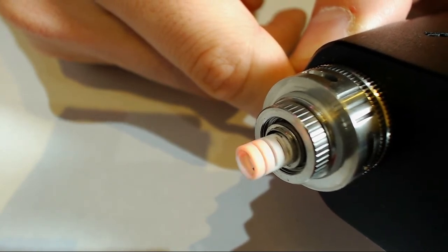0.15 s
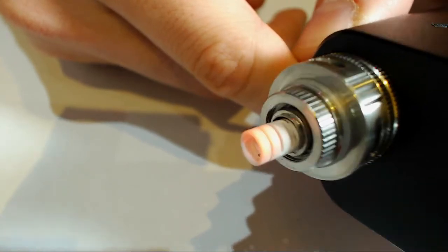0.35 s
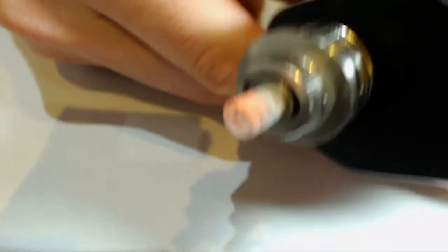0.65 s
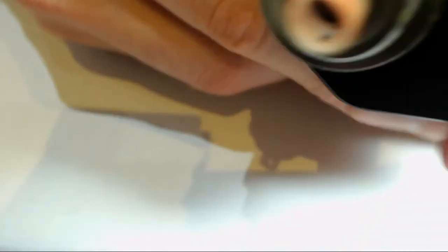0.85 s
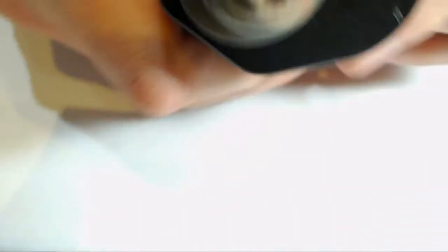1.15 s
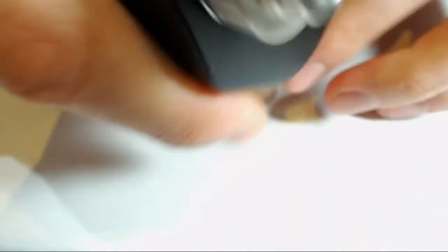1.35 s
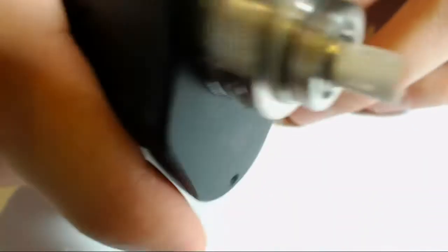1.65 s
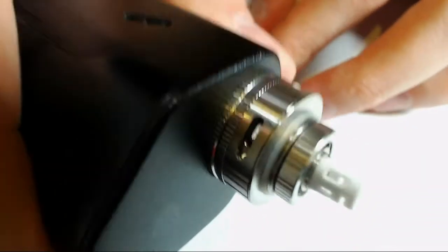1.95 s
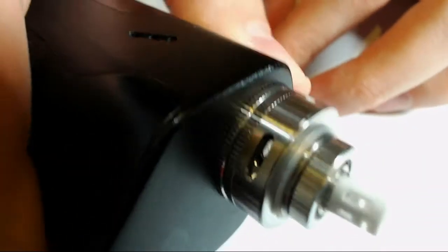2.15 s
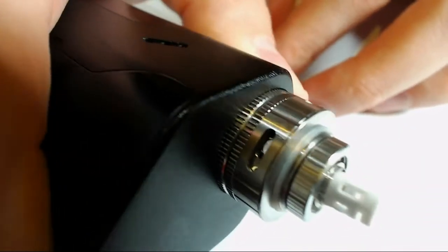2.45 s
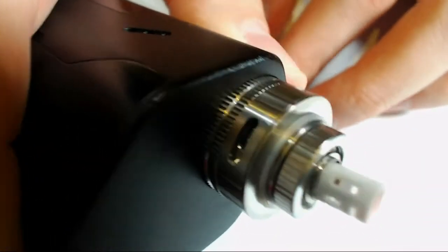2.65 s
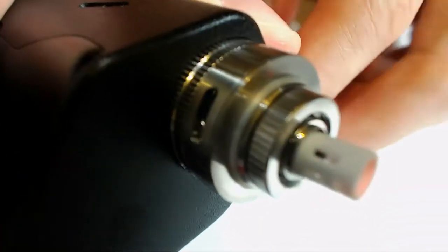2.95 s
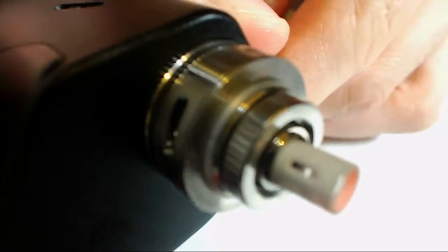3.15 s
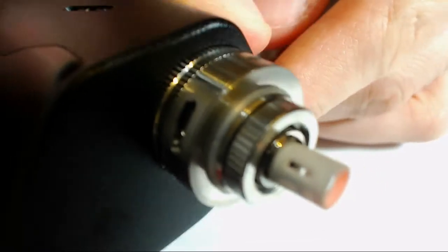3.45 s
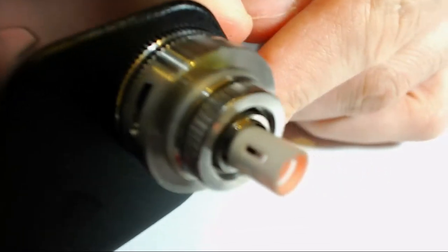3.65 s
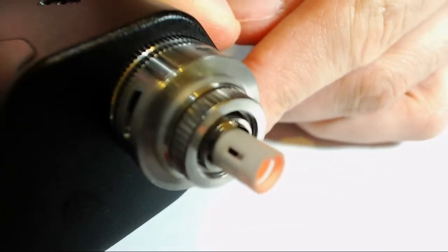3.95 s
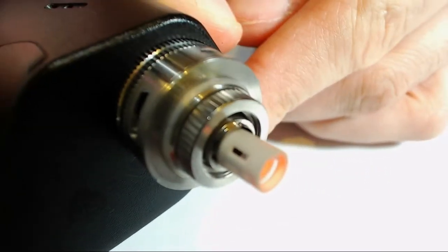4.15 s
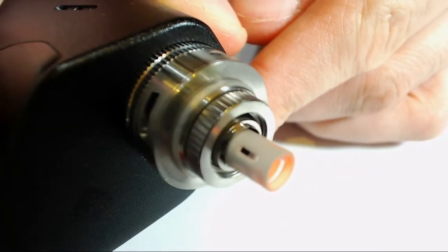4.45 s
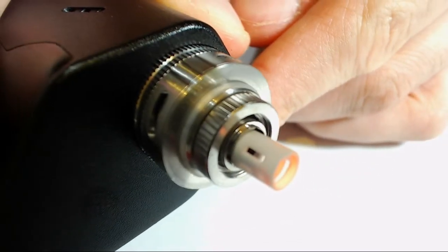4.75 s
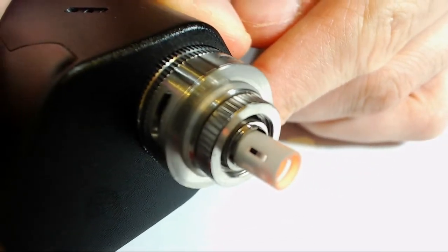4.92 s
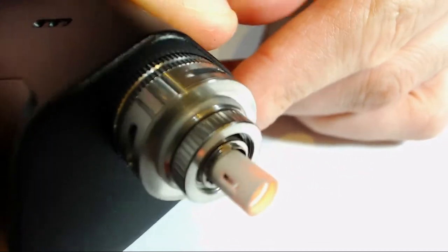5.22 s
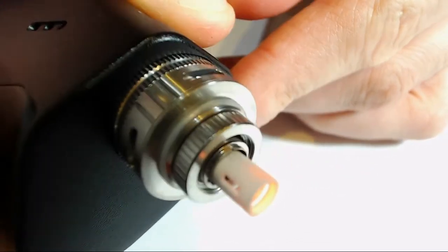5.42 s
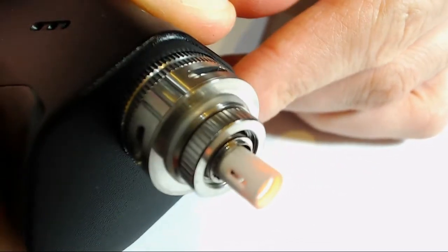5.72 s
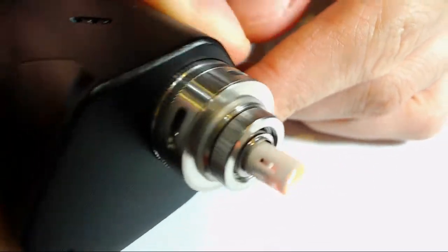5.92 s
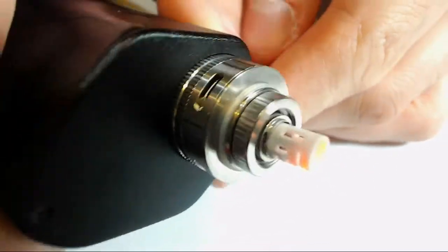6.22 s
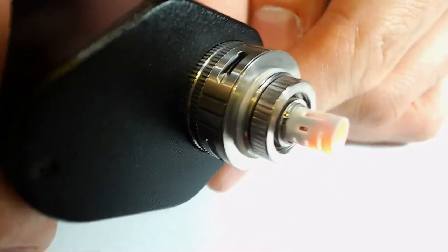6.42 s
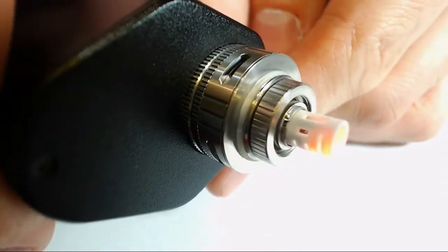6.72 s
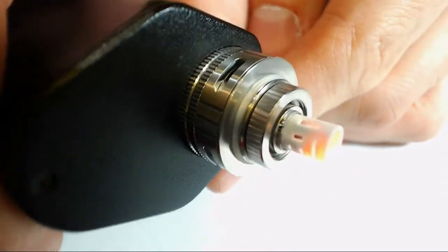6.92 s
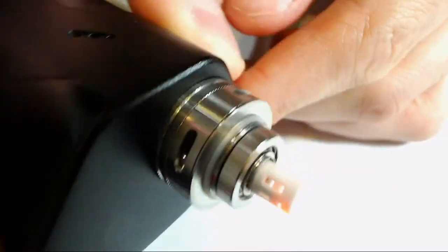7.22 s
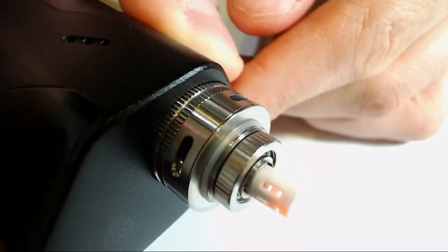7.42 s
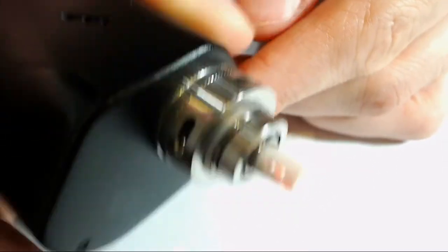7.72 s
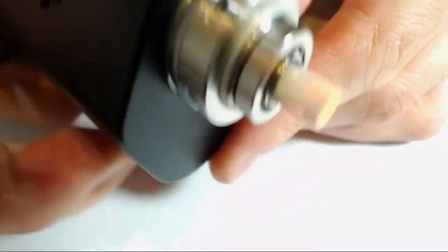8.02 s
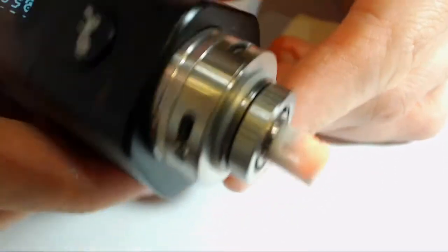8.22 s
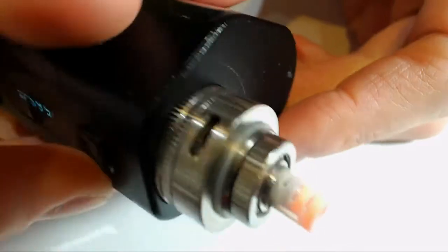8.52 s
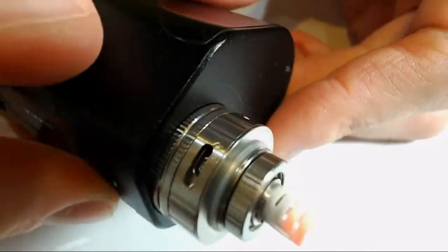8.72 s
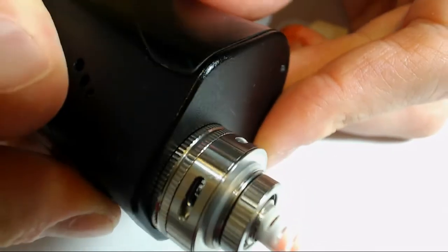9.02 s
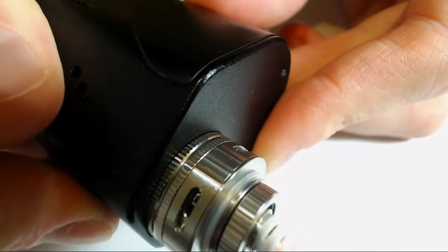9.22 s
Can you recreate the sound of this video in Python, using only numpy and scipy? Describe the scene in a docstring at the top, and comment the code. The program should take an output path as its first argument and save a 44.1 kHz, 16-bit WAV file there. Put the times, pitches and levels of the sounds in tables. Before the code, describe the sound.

Close up in a quiet room, small clicks precede a rapid sizzling crackle of residue burning off a hot little tube, which thins before more clicks.

```python
"""Ceramic tube burning off residue

A small ceramic heating tube, close to the microphone in a quiet room, burns off its residue.
Sharp pops (impulses), many with a short spit of steam (noise swarms), ring the tube over a fine sizzle.
The switch clicks (struck decaying modes); fingers rustle and bump the housing (band-passed noise).
Mains hum (sines), room noise and a faint electronic tick (gated sine) lie underneath."""
import sys
import numpy as np
from scipy import signal
from scipy.fft import rfft, irfft
from scipy.io import wavfile
from scipy.ndimage import uniform_filter1d

SR = 44100
rng = np.random.default_rng(int(sys.argv[2]) if len(sys.argv) > 2 else 0)


def to_wav(s):
    """Save 16-bit WAV."""
    ch = np.atleast_2d(s).T  # columns
    pcm = np.round(np.clip(ch, -1, 1) * 32767)  # PCM
    wavfile.write(sys.argv[1], SR, pcm.astype(np.int16))


N = 413216

# single bursts of residue: [t/s, nominal peak level/dB]
POPS = [(4.148, -38.5), (4.256, -31.5), (4.2775, -27), (4.3132, -27), (4.3227, -31.5), (4.3829, -37),
        (4.411, -32.5), (4.4344, -37), (4.472, -37), (4.496, -35.5), (4.508, -53), (4.5288, -26),
        (4.582, -29.5), (4.6142, -37.5), (4.624, -43), (4.6452, -41.5), (4.654, -60), (4.7201, -36),
        (4.743, -35), (4.7597, -30.5), (4.796, -30.5), (4.8485, -32), (4.925, -34), (4.994, -29),
        (5.011, -42), (5.0838, -28.5), (5.1225, -32.5), (5.189, -29), (5.2579, -29.5), (5.3097, -30.5),
        (5.3835, -30.5), (5.3943, -30), (5.459, -44), (5.466, -30), (5.479, -43), (5.5151, -31.5),
        (5.613, -32.5), (5.676, -29.5), (5.7237, -36), (5.7694, -32.5), (5.8179, -32), (5.8507, -33),
        (5.893, -35), (5.9498, -32.5), (5.991, -31), (6.021, -30), (6.0545, -33.5), (6.0864, -33),
        (6.111, -32), (6.1364, -32.5), (6.1685, -33.5), (6.223, -36), (6.2588, -29), (6.2901, -31),
        (6.333, -27), (6.3812, -34), (6.401, -29), (6.421, -29.5), (6.444, -29.5), (6.471, -30.5),
        (6.501, -34.5), (6.545, -35), (6.5876, -33.5), (6.624, -28.5), (6.661, -35), (6.6778, -30),
        (6.7043, -29.5), (6.7469, -31), (6.782, -32), (6.821, -35.5), (6.8605, -34.5), (6.9123, -34),
        (6.9667, -38.5), (7.015, -41), (7.0439, -37.5), (7.0673, -33.5), (7.0906, -36.5), (7.102, -45),
        (7.1186, -34.5), (7.1454, -34.5), (7.1755, -42), (7.216, -50.5), (7.2602, -44.5), (7.301, -40),
        (7.33, -40.5), (7.361, -39), (7.3869, -37), (7.4136, -37), (7.447, -44), (7.4777, -37),
        (7.5077, -39.5), (7.5399, -42), (7.574, -40.5), (7.638, -41), (7.669, -38.5), (7.7004, -37.5),
        (7.735, -34), (7.7567, -37), (7.799, -60), (7.8544, -47), (7.894, -45), (7.905, -47), (7.9352, -51),
        (7.977, -47), (8.016, -46.5), (8.041, -46), (8.086, -56.5), (8.135, -64), (8.187, -41.5),
        (8.237, -46), (8.3355, -42.5), (8.413, -46), (8.4488, -31.5), (8.461, -40), (8.478, -35.5),
        (8.5162, -40.5), (8.558, -55), (8.576, -41), (8.707, -52.5), (9.206, -60), (9.336, -54)]
# flurries of close bursts: [start t/s, end t/s, nominal peak level/dB]
FLURRIES = [(4.176, 4.202, -38), (4.21, 4.25, -33.5), (4.285, 4.305, -34), (4.549, 4.575, -39.5)]
FLURRY_GAP_S, FLURRY_JITTER_S, FLURRY_SPREAD_DB = 0.0077, 0.0007, 1.5
# another burst, usually weaker, follows each single one a few ms later
ANSWER_MS, ANSWER_SPREAD_MS, ANSWER_DB, ANSWER_SPREAD_DB = 4, 2, -9, 6.5
# spit length rises and falls over time, shortest around 6.2 to 7.6 s: [t/s, median spit/ms]
SPIT_LENGTH = [(4.1, 1.17), (4.6, 2.1), (4.9, 1.27), (5.4, 2.53), (6.1, 1.83), (6.17, 0.59), (7.55, 0.86),
               (8.2, 2.4), (8.42, 3), (8.45, 0.94), (9.2, 3.8)]
SPIT_SPREAD_DB = 3.5  # random spread of spit length
# fine sizzle, ahead of the resonances: [t/s, level/dB]
SIZZLE = [(4.12, -100), (4.2, -64), (4.36, -94), (4.548, -64), (4.7, -101), (5.099, -70.5), (5.6, -117),
          (6.1, -79.5), (6.7, -83), (7.25, -87), (7.7, -70), (7.901, -88), (8.335, -79), (8.359, -47.5),
          (8.41, -56.5), (8.45, -70), (8.599, -84), (8.75, -100)]
# how the tube faces the microphone:
# [t/s, treble level/dB, hollow level/dB, left minus right/dB, resonance shift/octaves]
FACING = [(4.25, 3, -22, -1.5, -0.1), (4.7, 1, -18, -1.5, 0.019), (5.2, -5, -13.5, -1.5, 0.012),
          (6.1, -4, -14, -0.5, 0.14), (6.4, -7, -15.5, 0.5, 0.037), (6.9, -12.5, -9.5, 1, -0.025),
          (7.1, -8, -0.5, -1.5, -0.0062), (7.601, -14, -1.5, -1, 0.0012), (7.951, -8, 0.5, -2, -0.21),
          (8.36, -5.5, -11, 0, 0.2)]
# resonances of the tube, width per filter pass: [f/Hz, width/Hz, relative level/dB]
TUBE = [(2150, 1100, 4), (3098, 680, 17), (4087, 1130, 14)]
# its treble resonances: [f/Hz, width/Hz, relative level/dB]
TUBE_TREBLE = [(5960, 1700, 16.5), (8100, 1200, 7.5), (9770, 2300, 7)]
# cupped hand and table: [f/Hz, width/Hz, relative level/dB]
HOLLOW = [(1318, 550, 12), (725, 580, 11.5)]
SPOT_SPREAD_OCTAVES = 0.038  # shift of the ring with the spot of a burst

# switch clicks; level is the peak of the struck body, ahead of snap, filter and pan:
# [t/s, level/dB, button f/Hz, housing/dB, spring/dB, cap/dB, snap/dB, left minus right/dB]
CLICKS = [(0.2453, -11.5, 1830, -3.5, -4.5, -14, -10.5, -2), (0.8952, -17, 2240, -23.5, -11, -2, -3.5, 1),
          (1.9153, -14, 2224, -3.5, -11, -3, -16.5, 0.5), (7.5943, -12, 2090, 6, 0, -3.5, -16.5, 1.5),
          (7.7203, -25.5, 2040, 0, 4, -1.5, -41, -1.5), (9.015, -15.5, 2300, 3, -9, -4.5, -11, 2.5)]
# modes of the housing: [f/Hz, relative level/dB, t60/s]
HOUSING_MODES = [(1074, 6, 0.0075), (1430, -1.5, 0.012)]
# modes of the spring: [f/Hz, relative level/dB, t60/s]
SPRING_MODES = [(2630, -2.5, 0.0078), (3960, 0, 0.0057)]
# modes of the cap: [f/Hz, relative level/dB, t60/s]
CAP_MODES = [(3010, -5.5, 0.0077), (4730, -3.5, 0.0087), (5740, -5, 0.0068)]
BUTTON_T60_S = 0.011

# fingers on the housing, width per filter pass: [t/s, length/s, level/dB, f/Hz, width/Hz]
RUSTLES = [(0.361, 0.041, -65.5, 3800, 5070), (0.702, 0.014, -46.5, 2210, 740),
           (0.692, 0.077, -64, 3000, 3000), (0.766, 0.095, -72, 5640, 5160),
           (0.957, 0.034, -74, 4230, 3000), (1.508, 0.073, -75.5, 4960, 3500),
           (1.253, 0.074, -59.5, 6140, 5400), (1.384, 0.058, -72.5, 5400, 3400),
           (1.628, 0.068, -73, 4750, 2800), (2.086, 1, -83, 4660, 1490), (2.335, 0.1, -71, 2110, 594),
           (2.471, 0.021, -72.5, 2250, 600), (2.501, 0.022, -69, 2100, 600),
           (2.687, 0.018, -70.5, 2600, 4500), (2.615, 0.031, -65, 1120, 500),
           (3.304, 0.047, -66.5, 2030, 830), (3.32, 0.014, -57.5, 1120, 410), (7.6, 0.16, -70, 3570, 3250),
           (8.803, 0.022, -52.5, 1230, 1250), (8.8037, 0.013, -56, 4600, 540)]
# dull bumps through the table: [t/s, length/s, level/dB, f/Hz]
BUMPS = [(0.705, 0.016, -57, 186), (0.695, 0.037, -56.5, 543), (2.607, 0.016, -60.5, 129),
         (2.678, 0.034, -61, 178), (3.303, 0.046, -50, 146), (8.799, 0.022, -54, 170)]

# mains hum, ahead of pan: [f/Hz, rms level/dB]
HUM = [(118.4, -72.5), (177.6, -72.5), (414.5, -74.5), (473.7, -80), (904, -81.5), (1001, -80), (1599, -85)]
# spectrum of the room noise: [f/Hz, relative density/dB]
ROOM = [(25, -0.5), (50, -7), (100, -5), (150, 3), (450, 0.5), (650, -7), (880, 0.5), (1100, -7),
        (1550, -6), (1750, -10.5), (4600, -20), (5500, -24), (10000, -25.5), (15000, -41.5)]
ROOM_RMS_DB = -68.5
TICK_HZ, TICK_PEAK_DB, TICK_RATE_HZ, TICK_START_S, TICK_S = 8120, -81.5, 30, 0.02, 0.006

TAIL_T60_S, TAIL_DB, TAIL_TOP_HZ = 0.081, -21, 4130
SCATTER_T60_S, SCATTER_DB = 0.024, -15
MIC_LOW_HZ, MIC_TOP_HZ, TOP_HZ = 72, 13600, 15800


def residue(pop_ms=1.0, crest_db=7.5, wall_ms=0.41, wall_per_ms=0.24,
            onset_ms=1.09, swell_power=0.71, spit_lag_ratio=0.85, scatter_db=3.5,
            after_db=-9, after_ms=11.5, lumpy_db=7.0, hiss_db=-18, hiss_ms=2.7, fry_db=-2.5,
            sizzle_grain_db=2.5, flicker_db=3.5,
            soft_hz=5000, spit_treble_db=12, sizzle_treble_db=-0.5):
    """Each pocket of residue bursts with one pop; steam then spits out as a swarm of tiny clicks."""
    most = 300  # bursts at most
    pops, spit, fry, hisses = np.zeros((4, N))
    t_ms = np.arange(1024) / SR * 1000
    grains = rng.standard_normal((most, 1024)) * undb(scatter_db * rng.exponential(size=(most, 1024)))
    lumps = undb(lumpy_db * np.repeat(rng.standard_normal((most, 16)), 64, axis=1))
    places = rng.random(most)
    sizes = undb(SPIT_SPREAD_DB * rng.standard_normal(most))

    for (s, db), grain, lump, place, size in zip(bursts(), grains, lumps, places, sizes):
        spit_ms = size * np.interp(s, *np.transpose(SPIT_LENGTH))
        energy = undb(db - crest_db) * np.sqrt((spit_ms + onset_ms) * SR / 2000)
        share = np.sqrt(min(pop_ms / spit_ms, 1))  # a long burst is mostly steam
        add(pops, s, np.array([share * energy]))
        # the far wall mirrors the pop, more so for a long spit; the delay colours each place
        wall_s = 2 / SR + place * wall_ms / 1000
        add(pops, s + wall_s, np.array([min(wall_per_ms * spit_ms, 1) * share * energy]))

        swell = np.sin(np.pi * np.minimum(t_ms / (spit_ms + onset_ms), 1)) ** swell_power
        burst = unit(grain * swell)
        add(spit, s + spit_lag_ratio * spit_ms / 1000, energy * np.sqrt(1 - share ** 2) * burst)
        after = unit(grain * lump * np.exp(-t_ms / after_ms))  # dies away in uneven lumps
        add(spit, s, energy * undb(after_db) * min(spit_ms, 1) * after)
        add(fry, s, energy * undb(fry_db) * after)  # fries on, dull
        # a faint hiss swells for a moment before the pop
        hiss = unit((grain * np.exp(-t_ms / hiss_ms))[::-1])
        add(hisses, s - len(hiss) / SR, energy * undb(hiss_db) * hiss)

    t = np.arange(N) / SR
    flicker = undb(flicker_db * np.repeat(rng.standard_normal(N // 256 + 1), 256)[:N])
    sizzle = flicker * rng.standard_normal(N) * undb(sizzle_grain_db * rng.exponential(size=N))
    sizzle = level(sizzle, 0) * undb(np.interp(t, *np.transpose(SIZZLE)))

    facing_s, *columns = np.transpose(FACING)
    treble_db, hollow_db, pan_db, octaves = (np.interp(t, facing_s, c) for c in columns)
    spot = np.searchsorted(np.array(POPS)[:, 0], t)  # each pocket sits at its own spot
    spot_shift = rng.standard_normal(most)[np.maximum(spot - 1, 0)]
    octaves = octaves + SPOT_SPREAD_OCTAVES * spot_shift

    # the gas pulse is rounded
    rounding = signal.butter(6, soft_hz, fs=SR, output="sos")
    soft = signal.sosfilt(rounding, pops + spit + hisses + sizzle)
    bright = undb(-spit_treble_db) * pops + spit + undb(sizzle_treble_db) * sizzle
    sound = tube(soft, octaves)
    sound = sound + undb(treble_db) * ring(bright, TUBE_TREBLE)
    sound = sound + undb(hollow_db) * ring(pops + 0.4 * spit + fry, HOLLOW)
    return sound * pan(pan_db)


def bursts():
    """Times and peak levels of all bursts: single ones, flurries, and the answers to single ones."""
    rows = list(POPS)
    for start, end, db in FLURRIES:
        chance = rng.standard_normal((32, 2))
        for s, (a, b) in zip(np.arange(start, end, FLURRY_GAP_S), chance):
            rows.append((s + FLURRY_JITTER_S * a, db + FLURRY_SPREAD_DB * b))
    s, db = np.transpose(POPS)
    late, weak = rng.exponential(size=(len(s), 2)).T
    # answers are stronger where spits are long
    length_db = 15 * np.log10(np.interp(s, *np.transpose(SPIT_LENGTH)))
    answer_s = s + (ANSWER_MS + ANSWER_SPREAD_MS * late) / 1000
    answer_db = db + ANSWER_DB + length_db - ANSWER_SPREAD_DB * weak
    return np.r_[rows, np.c_[answer_s, answer_db]]


def tube(x, octaves):
    """The tube's ring, its resonances shifted over time by blending a few fixed shifts."""
    steps = np.arange(-3, 4) / 10  # octaves
    distance = np.abs(np.clip(octaves, steps[0], steps[-1]) - steps[:, None])
    blend = np.maximum(1 - 10 * distance, 0)
    return sum(ring(b * x, [(hz * 2 ** step, width_hz, db) for hz, width_hz, db in TUBE])
               for step, b in zip(steps, blend))


def switch(rise_s=0.00021, rattle_s=0.0015, rattle_db=-14, give_s=0.0036, give_db=-24,
           snap_s=0.0015, thin_hz=700,
           buzz_db=-33, buzz_s=0.026, buzz_hz=1500, buzz_width_hz=1600, lumpy_db=4.0):
    """The plunger strikes and rattles; button, housing, spring and cap ring under a bright snap."""
    out = np.zeros((2, N))
    t = np.arange(4096) / SR
    after = np.maximum(t - give_s, 0)  # time since the strike
    struck = after > 0
    rattle_norm = np.sqrt(rattle_s * SR)
    for s, db, button_hz, housing_db, spring_db, cap_db, snap_db, pan_db in CLICKS:
        push = undb(rattle_db) * rng.standard_normal(len(t)) * np.exp(-t / rattle_s) / rattle_norm
        push[0] = 1  # the strike
        # the button creaks as it gives way
        give = undb(give_db) * rng.standard_normal(int(give_s * SR)) / rattle_norm
        push = np.r_[give, push][:len(t)]

        button = [(button_hz, 0, BUTTON_T60_S)]
        parts = [(button, 0), (HOUSING_MODES, housing_db), (SPRING_MODES, spring_db), (CAP_MODES, cap_db)]
        rings = np.zeros(len(t))
        for modes, part_db in parts:
            for k, (hz, mode_db, t60) in enumerate(modes):
                decay = undb(part_db + mode_db - 60 * t / t60)
                rings += (-1) ** k * decay * np.sin(2 * np.pi * hz * t)
        body = signal.oaconvolve(push, rings * (1 - np.exp(-t / rise_s)))[:len(t)]

        snap = band2(rng.standard_normal(len(t)) * np.exp(-after / snap_s) * struck, 8500, 5000)
        hit = body / np.abs(body).max() + undb(snap_db) * snap
        # the small housing radiates no bass
        hit = signal.sosfilt(signal.butter(4, thin_hz, "high", fs=SR, output="sos"), hit)

        # loose parts buzz on unevenly for a moment
        lumps = undb(lumpy_db * np.repeat(rng.standard_normal(32), 128))
        buzz = band2(lumps * rng.standard_normal(len(t)), buzz_hz, buzz_width_hz)
        buzz = level(buzz, buzz_db + min(housing_db, 0) / 2)
        hit = hit + buzz * np.exp(-after / buzz_s) * struck
        add(out, s - give_s, undb(db) * pan(pan_db)[:, None] * hit)
    return out


def fingers(grain_db=2.0, thud_hz=95, thud_db=-6):
    """Skin slips over the housing in fine grains; bumps are short low swells."""
    out = np.zeros(N)
    grains = rng.standard_normal(N) * undb(grain_db * rng.exponential(size=N))
    for s, length_s, db, hz, width_hz in RUSTLES:
        i, n = int(s * SR), int(length_s * SR)
        swell = np.sin(np.pi * np.sqrt(np.arange(n) / n))  # quick rise, slower fall
        add(out, s, level(swell * band2(grains[i:i + n], hz, width_hz), db))
    for s, length_s, db, hz in BUMPS:
        i, n = int(s * SR), int(length_s * SR)
        swell = np.hanning(n) ** 0.5
        add(out, s, level(swell * band2(grains[i:i + n], hz, 0.5 * hz), db))
        thud = band2(grains[i - n:i + n], thud_hz, thud_hz)[n:]  # skip the filter's build-up
        add(out, s, level(swell * thud, db + thud_db))
    return out


def background(side_db=-11, far_side_db=-5, hum_pan_db=-2.4, hum_lag_rad=0.55):
    """Room noise, wider in deep bass and top treble; mains hum; a regular faint electronic tick."""
    t = np.arange(N) / SR
    log_hz = np.log(np.maximum(np.arange(N // 2 + 1) * SR / N, 1))
    room_hz, room_db = np.transpose(ROOM)
    colour = undb(np.interp(log_hz, np.log(room_hz), room_db))
    wide_db = [far_side_db, side_db, side_db, far_side_db]
    wide = undb(np.interp(log_hz, np.log([60, 600, 4000, 12000]), wide_db))
    mid, side = rfft(rng.standard_normal((2, N))) * colour
    air = level(irfft(np.array([mid + wide * side, mid - wide * side]), N), ROOM_RMS_DB)

    lag = hum_lag_rad * np.array([[0], [1]])  # left, right
    hum = sum(np.sqrt(2) * undb(db) * np.sin(2 * np.pi * (hz * t + rng.random()) + lag)
              for hz, db in HUM)

    gate = 1.0 * ((t - TICK_START_S) % (1 / TICK_RATE_HZ) < TICK_S)
    gate = uniform_filter1d(gate, size=64)  # soft edges
    tick = undb(TICK_PEAK_DB) * gate * np.sin(2 * np.pi * TICK_HZ * t)
    return air + hum * pan(hum_pan_db)[:, None] + tick


def undb(db):
    """Gain of a level in dB."""
    return 10 ** (np.asarray(db) / 20)


def level(x, db):
    """Scale to an rms level."""
    return x * undb(db) / np.sqrt(np.mean(x ** 2))


def unit(x):
    """Scale to unit energy."""
    return x / np.linalg.norm(x)


def band(x, hz, width_hz):
    """One resonance, gain 1 at its centre."""
    return signal.lfilter(*signal.iirpeak(hz, hz / width_hz, fs=SR), x)


def band2(x, hz, width_hz):
    """Steep resonance: two passes of the same band."""
    return band(band(x, hz, width_hz), hz, width_hz)


def ring(x, modes):
    """Sum of steep resonances of alternating sign, scaled so that an impulse keeps its energy."""
    def resonate(v):
        return sum((-1) ** k * undb(db) * band2(v, hz, width_hz)
                   for k, (hz, width_hz, db) in enumerate(modes))
    impulse = np.eye(1, 2048)[0]
    return resonate(x) / np.linalg.norm(resonate(impulse))


def add(out, s, x):
    """Mix x into out from time s."""
    i = int(s * SR)
    out[..., i:i + x.shape[-1]] += x[..., :N - i]


def pan(db):
    """Left and right gains for a left minus right level."""
    return undb(np.array([db, -db]) / 2)


def scene():
    """Near sounds come direct, scattered by hands and table, and with a short, dull room tail."""
    near = residue() + switch() + fingers()
    t = np.arange(8192) / SR
    tail = rng.standard_normal((3, len(t))) * undb(-60 * t / TAIL_T60_S) * (1 - np.exp(-t / 0.0019))
    tail = tail[0] + 0.059 * tail[1:]  # nearly mono
    tail = signal.lfilter(*signal.butter(1, TAIL_TOP_HZ, fs=SR), tail)
    scatter = rng.standard_normal((2, len(t))) * undb(-60 * t / SCATTER_T60_S)
    echo = undb(TAIL_DB) * tail / np.linalg.norm(tail[0])
    echo = echo + undb(SCATTER_DB) * scatter / np.linalg.norm(scatter[0])
    echo[:, 0] = 1  # direct sound
    return signal.oaconvolve(near, echo, axes=1)[:, :N] + background()


def record(dry):
    """The microphone fades in the deep bass and the top octave; the recorder cuts the top."""
    heard = signal.lfilter(*signal.butter(2, MIC_TOP_HZ, fs=SR), dry)
    heard = signal.sosfilt(signal.butter(3, MIC_LOW_HZ, "high", fs=SR, output="sos"), heard)
    return signal.sosfilt(signal.ellip(8, 0.2, 70, TOP_HZ, fs=SR, output="sos"), heard)


dry = scene()
out = record(dry)
to_wav(out)
```